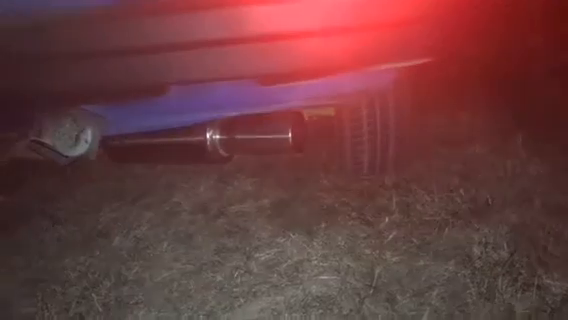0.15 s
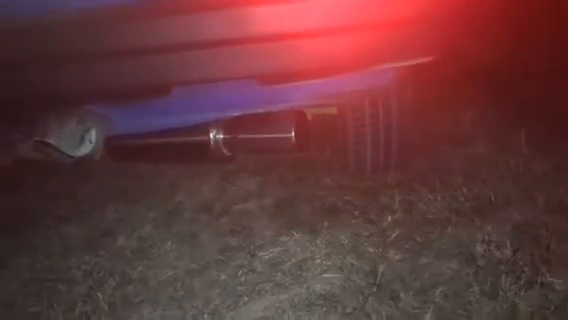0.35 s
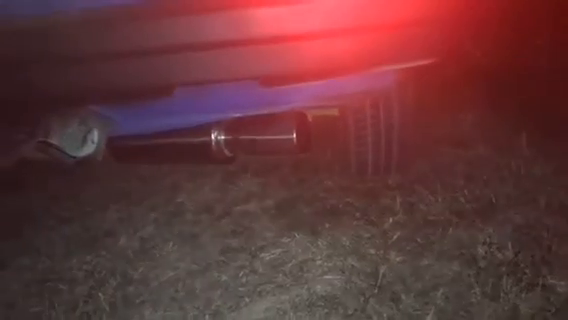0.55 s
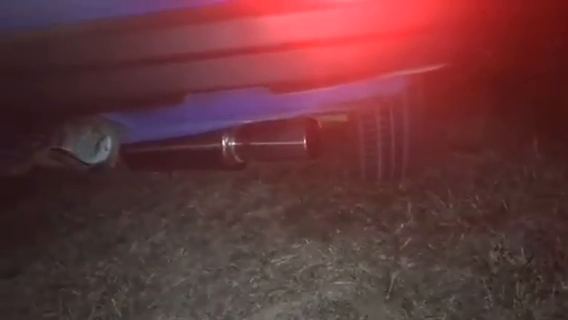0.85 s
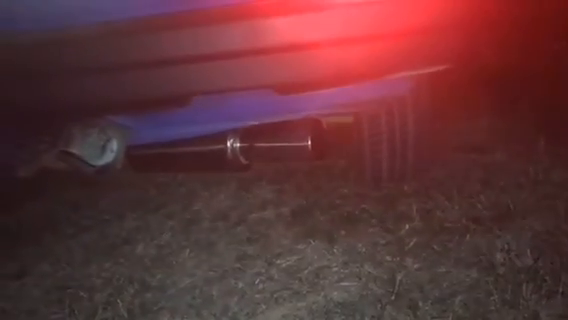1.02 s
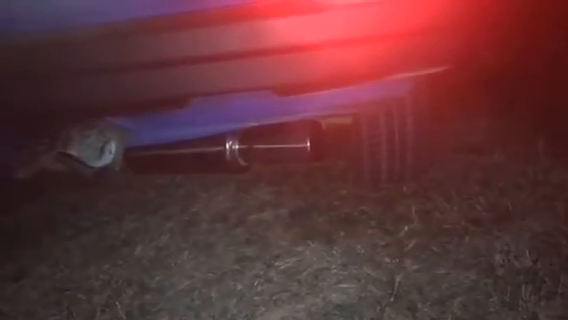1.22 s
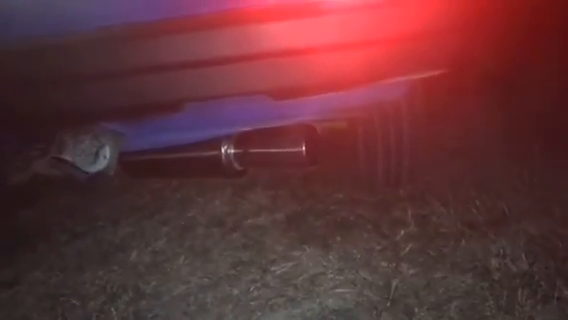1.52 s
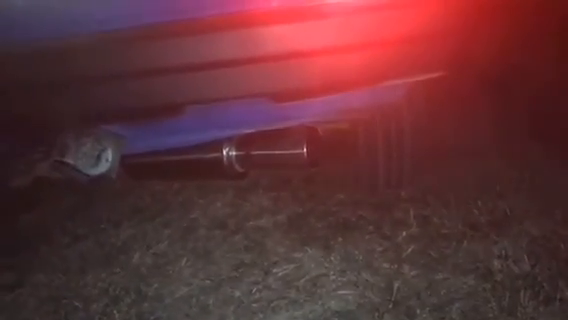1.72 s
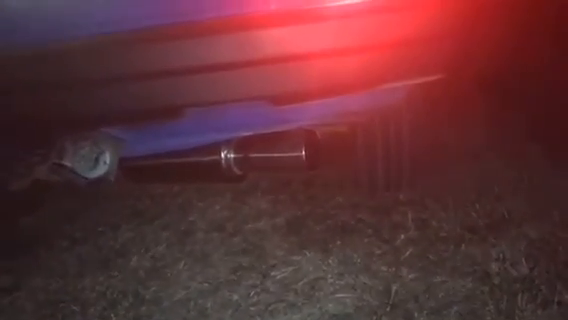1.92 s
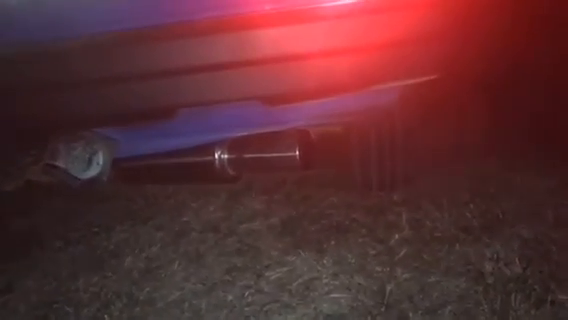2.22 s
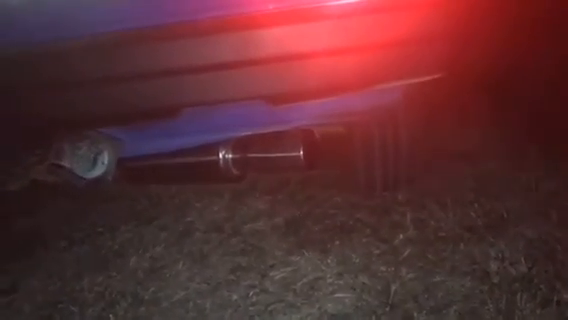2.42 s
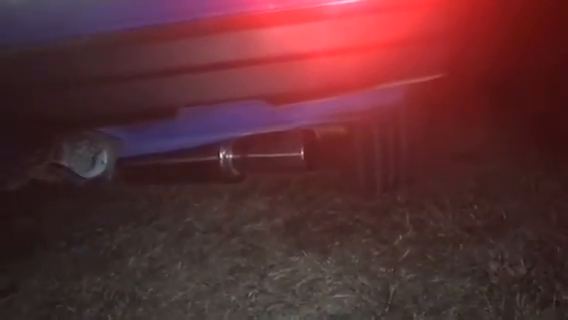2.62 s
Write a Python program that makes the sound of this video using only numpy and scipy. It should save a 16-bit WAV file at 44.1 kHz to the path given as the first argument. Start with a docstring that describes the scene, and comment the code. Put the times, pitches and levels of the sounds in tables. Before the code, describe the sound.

A four-cylinder car engine through a free-flowing exhaust, close and outdoors. Silence until 0.2 s, then an abrupt, low throbbing fast idle. From about 0.75 s it revs up, the pitch climbing steadily into a hard, raspy buzz by 1.9 s. From 1.95 to 2.6 s it stutters irregularly on the limiter with booms, thumps, crackles and pops, then the throttle lifts and the rasp softens slightly.

```python
"""A four-cylinder engine with an open exhaust, heard from close behind on grass: summed firing orders
under a rasp of shock fronts and hiss. After a short silence it opens abruptly on a fast idle and revs hard.
The rev limiter cuts the spark of one or both cylinder pairs: the pipe booms (ringing modes), the flow
thumps (sliding notes) and unburnt fuel pops (cracks and thuds); then the throttle lifts. Low noise throbs
with the firing, and short echoes come off the ground and bodywork."""
import sys
import numpy as np
from scipy import signal
from scipy.fft import rfft, irfft
from scipy.io import wavfile
from scipy.ndimage import uniform_filter1d

SR = 44100
rng = np.random.default_rng(int(sys.argv[2]) if len(sys.argv) > 2 else 0)


def transcribe(signal):
    """Save signal, clipped to [-1, 1], as a 16-bit WAV file at the path in sys.argv[1]."""
    frames = np.atleast_2d(signal).T
    limited = np.clip(frames, -1, 1)
    pcm = np.round(limited * 32767).astype(np.int16)
    wavfile.write(sys.argv[1], SR, pcm)


def volts(x):
    """Linear amplitude factor 10**(x/20) for a level x in dB, scalar or array-like."""
    e = np.asarray(x, float) / 20
    return 10 ** e


N = 121275

# Multiples of the firing rate that sound as tones: (multiple)
ORDERS = [.5, 1, 1.5, 2, 2.5, 3, 4, 5]
# Engine from idle through the rev: (time [s], firing rate [Hz], level of each of the eight orders [dB],
# relative rasp level [dB], rumble level [dB])
REV_UP = [(0.22, 33.18, -40, -35.5, -38.5, -21.5, -53.5, -24, -19.5, -30.5, -58, -33),
          (0.262, 33.05, -5, -20.5, -44, -18, -18.5, -26, -20.5, -23.5, -56, -42.5),
          (0.564, 32.97, -12.5, -18.5, -37, -18.5, -25.5, -26, -21, -25, -58, -42),
          (0.718, 33.53, -5.5, -22, -33, -18, -26.5, -25.5, -20.5, -24, -59, -40.5),
          (0.77, 34.74, -12, -18, -18, -16, -31, -21, -16, -19, -54, -37.5),
          (0.842, 38.61, -28.5, -20.5, -15.5, -10.5, -28.5, -17.5, -18, -47, -50, -28.5),
          (0.924, 47.07, -28.5, -20.5, -34, -10, -26.5, -24.5, -29.5, -35.5, -51, -44.5),
          (0.972, 53.44, -46.5, -36, -32, -16, -43, -20, -44, -40.5, -52, -32.5),
          (1.062, 62.89, -53.5, -18.5, -35, -17, -17.5, -35, -34.5, -49.5, -54.5, -32.5),
          (1.154, 70.54, -41, -17.5, -22.5, -19.5, -26.5, -51.5, -32, -57, -53, -36.5),
          (1.226, 76.72, -46, -14.5, -35, -23, -63.5, -47.5, -64, -51, -57.5, -30.5),
          (1.36, 88.2, -39, -11, -35.5, -28.5, -52, -26.5, -41.5, -45, -48, -24),
          (1.45, 109.7, -47.5, -11, -24, -27.5, -32, -29, -45.5, -36, -33.5, -13),
          (1.522, 128, -19, -10.5, -23.5, -26, -37, -43.5, -21, -43, -29, -52),
          (1.584, 143.5, -29.5, -12.5, -32.5, -26, -32.5, -33.5, -42.5, -36.5, -29.5, -39),
          (1.628, 154.6, -20, -13.5, -32.5, -27.5, -62, -28.5, -45.5, -61.5, -31, -37.5),
          (1.704, 172.6, -22, -14, -30.5, -32, -43.5, -24, -43, -38, -27.5, -32.5),
          (1.804, 194.1, -23.5, -17.5, -27, -32.5, -34.5, -68, -48, -37, -27.5, -26.5),
          (1.886, 207, -26.5, -19, -33.5, -36, -30, -33, -37.5, -32, -27, -33),
          (1.94, 213.2, -24, -16.5, -40.5, -31, -47.5, -59.5, -40, -40, -29.5, -30.5)]
# Engine held at the limiter, then lifting: columns as in REV_UP
AT_LIMITER = [(1.97, 211.7, -30, -14, -31, -36, -27, -57, -51.5, -44, -26, -29),
              (2.61, 210.4, -27, -17, -36.5, -33.5, -43, -68.5, -45, -33, -26, -17.5),
              (2.64, 197.1, -42.5, -28.5, -39.5, -34, -31, -40.5, -59, -41, -29, -27),
              (2.75, 196.3, -27, -19, -46.5, -37.5, -39.5, -42.5, -66.5, -42.5, -28, -50)]
# Weak steady quarter orders: (multiple of the firing rate, level [dB])
QUARTER_ORDERS = [(.25, -38.5), (.75, -30.5), (1.25, -45), (3.5, -46.5), (4.5, -39.5)]
# Spark cut on both pairs: (time [s], length [s], change of firing level [dB],
# relative thump level at the cut [dB], relative thump level at the relight [dB])
FULL_CUTS = [(1.948, .009, -43, -22, -5), (2.005, .024, -13.5, -7.5, -14), (2.074, 0.008, -14.5, -0.5, -20),
             (2.28, 0.031, -2, -22, -30), (2.311, 0.013, -17, -24, -8), (2.41, .032, -4.5, -22, -27),
             (2.443, 0.015, -10, -21, -1), (2.516, 0.02505, -26, -27, -6), (2.615, .017, -43, -3, -35)]
# Spark cut on one pair, every second firing missing: (time [s], length [s], relative boom level [dB])
HALF_CUTS = [(2.039, 0.014, -10), (2.075, 0.022, -11.5), (2.127, .078, -12.5), (2.245, .034, -14),
             (2.395, 0.023, -16), (2.527, 0.041, -15)]
# Fuel lighting in the pipe: (time [s], relative crack level [dB], relative thud level [dB])
FUEL_POPS = [(1.9932, -18.5, -12.5), (2.0053, -10, -6.5), (2.053, -21, -22), (2.068, -10, -5.5),
             (2.1091, -24.5, -23.5), (2.2161, -30.5, -8), (2.2693, -6, -30), (2.3349, -17, -1),
             (2.3997, -6, -9), (2.4806, -12.5, -17.5), (2.5973, -10, -11), (2.6084, -4, -37)]
# Boom modes of the pipe: (frequency [Hz], relative level [dB], 60 dB decay time [s])
PIPE_MODES = [(63.3, 7, 0.025), (100.6, 13, 0.024), (142, 4, 0.063)]
# Rasp of each cylinder in firing order, in full only at speed: (level [dB])
CYLINDER_LEVELS = [2, -5, 0, -6]
# Shock front over the hiss: (firing rate [Hz], level [dB])
SHOCK_LEVELS = [(33, 10), (42, 27), (60, 25), (90, 18), (120, 24), (180, 21), (212, 18)]
# Spectrum of rasp and pops at the tip: (frequency [Hz], relative level [dB])
RASP_SPECTRUM = [(200, -14), (330, 4.5), (520, 8.5), (900, 3), (1110, -3.5), (1250, -1), (1370, -6),
                 (1600, 1.5), (2200, -3), (3000, -8.5), (3450, -16), (4000, -23.5), (5300, -32),
                 (7300, -28), (8000, -41.5), (10500, -51.5), (12500, -43.5), (16000, -71.5)]
# Tailpipe resonances: (frequency [Hz], width [Hz], lift [dB])
TAILPIPE_PEAKS = [(1960, 160, 7), (2400, 130, 3), (2820, 170, 4), (4500, 600, 12)]
# Spectrum of the low noise: (frequency [Hz], relative level [dB])
RUMBLE_SPECTRUM = [(25, -5), (60, 5), (180, 2.5), (260, 6.5), (350, -16), (500, -1), (700, -29.5),
                   (1200, -39), (4000, -58.5)]
# Treble lift of rasp and pops: (time [s], lift [dB])
TREBLE_LIFT = [(.22, -1), (.7, -0.5), (.9, 9), (1.201, -0.5), (1.499, 2), (1.901, 5), (2.3, 6),
               (2.599, 7.5), (2.7, 10)]
# Echoes from ground and bodywork: (delay [s], level [dB])
ECHOES = [(.0036, -28.5), (.011, -17.5), (.027, -12.5)]

BOOM_LEAD_S = .007   # booms and thumps start this long before the rasp changes


def firing_tones(rate, firings, full_cut_db):
    """The low orders of the firing waver a little and change level when the spark is cut."""
    wobble_hz, half_cut_db = 14, -18.5
    pipe_lag_hz = 100   # higher partials leave the pipe late
    uneven = unevenness(rate)
    levels = [(multiple, engine_column(i + 2)) for i, multiple in enumerate(ORDERS)]
    levels += [(round(4 * multiple) / 4, db) for multiple, db in QUARTER_ORDERS]
    wobble_db = 1.0 - 1.5 * uneven   # 1 dB deep at idle, half that at speed
    tones = np.zeros(N)
    for multiple, db in levels:
        level = np.sqrt(2) * volts(db + wobble_db * drift(wobble_hz))
        if multiple % 1:
            level = level * uneven   # fractional orders come in with speed
        lag = .5 * (1 + np.minimum(multiple * rate / pipe_lag_hz, 2) ** 2)
        phase_wobble = .35 * (1 - uneven) * drift(wobble_hz)   # rad, strongest at idle
        tones += level * np.cos(2 * np.pi * multiple * firings - lag + phase_wobble)
    half_db = held_over(HALF_CUTS, [half_cut_db] * len(HALF_CUTS))
    return tones * uniform_filter1d(volts(full_cut_db + half_db), size=180)


def rasp(rate, firings, full_cut_db):
    """Each firing leaves the tip as a shock front with a dying burst of hiss, over a steady flow."""
    lag_firings, jitter_firings, jitter_hz = .6, .022, 60   # shock fronts come a little early or late
    scatter_db, missing_cylinder_db = 1.7, -5.5
    hiss_db_per_firing, flow_db, hiss_from_hz = 20, -15, 800
    lift_s, lift_shock_db = 2.62, -9   # the throttle lifts and the shock fronts soften
    at_tip = np.maximum.accumulate(firings + lag_firings + jitter_firings * drift(jitter_hz))
    number = np.floor(at_tip).astype(int)
    cylinder_db = unevenness(rate, least=.2) * np.array(CYLINDER_LEVELS)[number % 4]
    missing_db = held_over(HALF_CUTS, [missing_cylinder_db] * len(HALF_CUTS)) * (number % 2)
    chance_db = scatter_db * rng.standard_normal(2000)[number]
    size = volts(cylinder_db + missing_db + chance_db)

    shock_db = np.interp(rate, *np.transpose(SHOCK_LEVELS)) + lift_shock_db * (np.arange(N) / SR > lift_s)
    shock = size * np.diff(number, prepend=number[0]) * volts(shock_db)
    burst = size * volts(-hiss_db_per_firing * (at_tip - number))
    hiss = (burst + volts(flow_db)) * rng.standard_normal(N)
    hiss = signal.lfilter(*signal.butter(2, hiss_from_hz, "high", fs=SR), hiss)
    raw = hiss - shock
    even = raw / np.sqrt(uniform_filter1d(raw ** 2, size=5000))   # evened over about 0.1 s
    level = volts(engine_column(10) + 4.5) * uniform_filter1d(volts(full_cut_db), size=90)
    return colour(even * level, RASP_SPECTRUM, TAILPIPE_PEAKS)


def pipe_booms(firings):
    """Each missing firing of a half cut is a hole in the exhaust flow that sets the pipe booming."""
    at = np.flatnonzero(np.diff(np.floor(firings)) > 0)
    number = np.floor(firings[at + 1]).astype(int)
    early_cuts = [(s - BOOM_LEAD_S, length) for s, length, _ in HALF_CUTS]
    depth = held_over(early_cuts, [volts(db) for _, _, db in HALF_CUTS])
    holes = np.zeros(N)
    holes[at] = -depth[at] * (number % 2)
    boom = sum(volts(db) * ring(holes, hz, t60) for hz, db, t60 in PIPE_MODES)
    return signal.sosfilt(signal.butter(2, [45, 170], "band", fs=SR, output="sos"), boom)


def cut_thumps():
    """The flow collapses at a full cut (note falls) and surges when the spark returns (note rises)."""
    out = np.zeros(N)
    for s, length, _, cut_db, relight_db in FULL_CUTS:
        start = s - BOOM_LEAD_S
        out += sliding_note(start, cut_db, from_hz=190, to_hz=55, slide_s=.013, t60=.09)
        out -= sliding_note(start + length, relight_db, from_hz=60, to_hz=250, slide_s=.012, t60=.093)
    return out


def sliding_note(s, db, from_hz, to_hz, slide_s, t60):
    """A dying low note whose pitch slides exponentially towards to_hz."""
    t = np.maximum(np.arange(N) / SR - s, 0)
    cycles = to_hz * t + (from_hz - to_hz) * slide_s * (1 - np.exp(-t / slide_s))
    onset = 1 - np.exp(-t / 0.0028)
    return volts(db - 60 * t / t60) * onset * np.sin(2 * np.pi * cycles)


def fuel_pops():
    """Unburnt fuel lights in the pipe: a crack with dying hiss and a short ringing thud."""
    shock_db, hiss_t60_s = 19, .03
    crack, thud = np.zeros((2, N))
    for s, crack_db, thud_db in FUEL_POPS:
        crack[int(s * SR)] = volts(crack_db - 5.5)
        thud[int(s * SR)] = volts(thud_db)
    envelope = signal.lfilter([1], [1, -volts(-60 / (hiss_t60_s * SR))], crack)
    burst = volts(shock_db) * crack + envelope * rng.standard_normal(N)
    return colour(burst, RASP_SPECTRUM, TAILPIPE_PEAKS) + ring(thud, hz=165, t60=.027)


def rumble(firings):
    """Turbulent low noise that throbs with the firing."""
    throb = 1 + 0.42 * np.cos(2 * np.pi * firings)
    noise = colour(rng.standard_normal(N) * throb, RUMBLE_SPECTRUM)
    return volts(uniform_filter1d(engine_column(11), size=9000)) * noise


def lift_treble(bright):
    """Adds high-passed sound, so that the treble rises and falls over time."""
    lift = volts(np.interp(np.arange(N) / SR, *np.transpose(TREBLE_LIFT))) - 1
    return bright + lift * signal.lfilter(*signal.butter(2, 4630, "high", fs=SR), bright)


def add_echoes(bright):
    """Ground and bodywork return delayed, weaker copies."""
    return bright + sum(volts(db) * np.roll(bright, int(s * SR)) for s, db in ECHOES)


def engine_column(column):
    """One column of the engine tables, interpolated over the whole scene."""
    rows = np.array(list(REV_UP) + list(AT_LIMITER))
    return np.interp(np.arange(N) / SR, rows[:, 0], rows[:, column])


def unevenness(rate, least=0):
    """Difference between cylinders: least at idle, rising to 1 between 55 and 85 firings a second."""
    return np.clip((rate - 55) / 30, least, 1)


def held_over(rows, values):
    """Each row's value held over its (time [s], length [s]), zero elsewhere."""
    t = np.arange(N) / SR
    return sum(v * ((t >= r[0]) & (t < r[0] + r[1])) for r, v in zip(rows, values))


def drift(hz):
    """Slow chance of rms 1: noise through a two-pole low-pass, its first second dropped."""
    r = np.exp(-2 * np.pi * hz / SR)
    slow = signal.lfilter([1], [1, -2 * r, r * r], rng.standard_normal(N + SR))[SR:]
    return slow / np.sqrt(np.mean(slow ** 2) + 1e-20)


def ring(x, hz, t60):
    """A damped resonance: two poles that lose 60 dB in t60 seconds."""
    r, w = volts(-60 / (t60 * SR)), 2 * np.pi * hz / SR
    return signal.lfilter([0, np.sin(w)], [1, -2 * r * np.cos(w), r * r], x + 1e-18)


def colour(x, spectrum, peaks=()):
    """Causal (minimum-phase) filter; white noise of rms 1 keeps rms 1."""
    f = np.maximum(np.fft.rfftfreq(8192, 1 / SR), 1)
    hz, db = np.transpose(spectrum)
    db = np.interp(np.log(f), np.log(hz), db)
    for centre, width, gain_db in peaks:
        db = db + gain_db / (1 + (2 * (f - centre) / width) ** 2)
    cepstrum = irfft(np.log(volts(db)))   # folded onto positive times for minimum phase
    cepstrum[1:4096] *= 2
    cepstrum[4097:] = 0
    h = irfft(np.exp(rfft(cepstrum)))
    return signal.fftconvolve(x, h / np.sqrt(np.sum(h ** 2)))[:N]


def scene():
    """The engine at its tailpipe, with treble lift and echoes on the rasp and pops only."""
    rate = engine_column(1)
    firings = np.cumsum(rate) / SR   # running count of firings
    full_cut_db = held_over(FULL_CUTS, [row[2] for row in FULL_CUTS])
    bright = rasp(rate, firings, full_cut_db) + fuel_pops()
    bright = add_echoes(lift_treble(bright))
    low = firing_tones(rate, firings, full_cut_db) + pipe_booms(firings) + cut_thumps() + rumble(firings)
    return (low + bright)[None]


def low_pass(x):
    """Removes everything above the highest recorded frequency."""
    return signal.sosfilt(signal.butter(12, 15800, fs=SR, output="sos"), x)


def record(dry):
    """Peaks are rounded softly; the sound opens abruptly after a short silence."""
    opens_s, ceiling = .2125, 0.78
    rounded = ceiling * np.tanh(dry / ceiling)
    mix = rounded * (np.arange(N) / SR > opens_s)
    return low_pass(mix)


dry = scene()
out = record(dry)
transcribe(out)
```